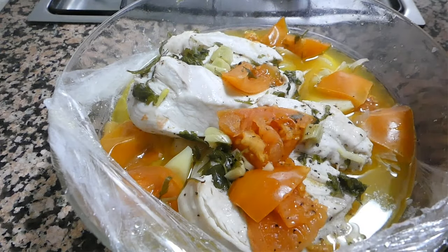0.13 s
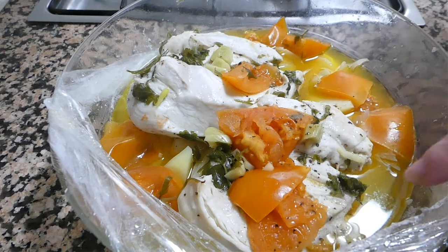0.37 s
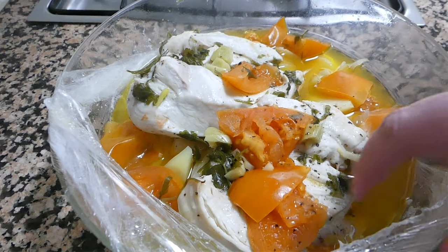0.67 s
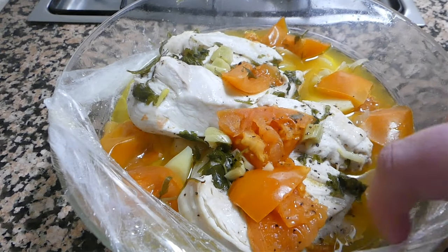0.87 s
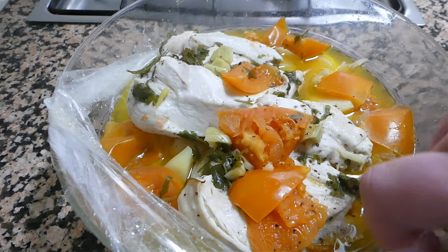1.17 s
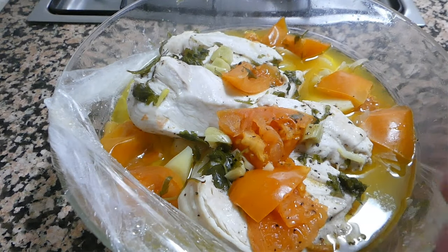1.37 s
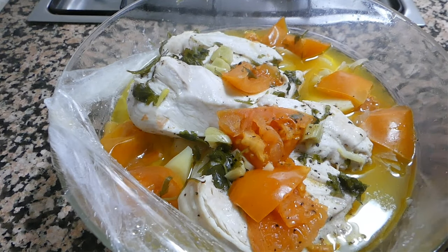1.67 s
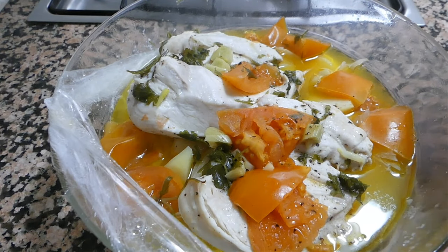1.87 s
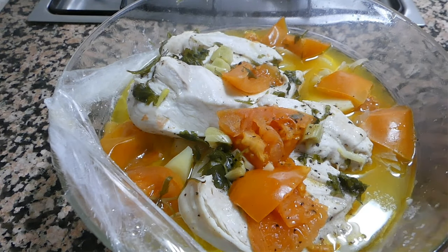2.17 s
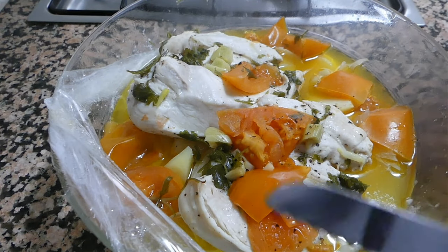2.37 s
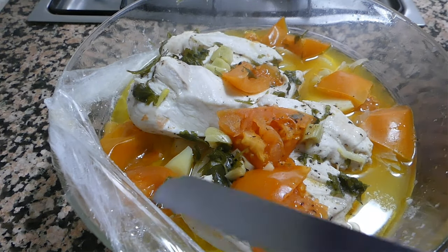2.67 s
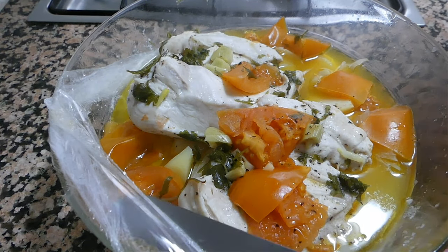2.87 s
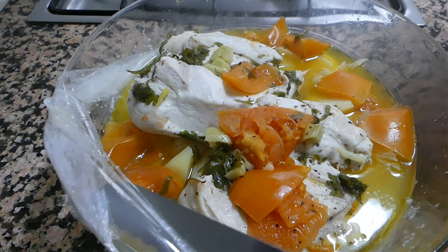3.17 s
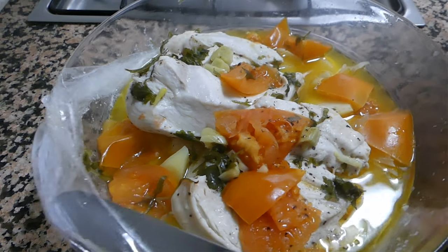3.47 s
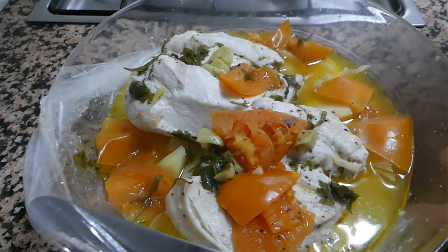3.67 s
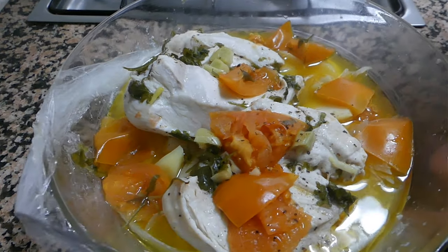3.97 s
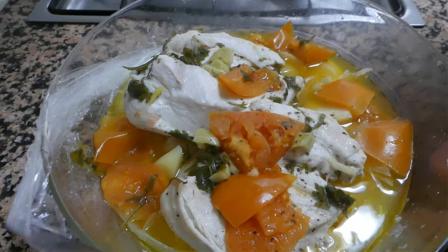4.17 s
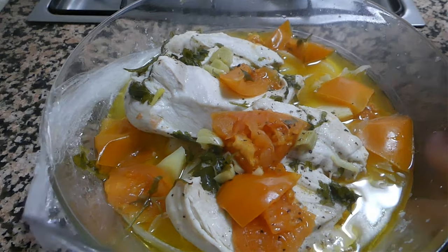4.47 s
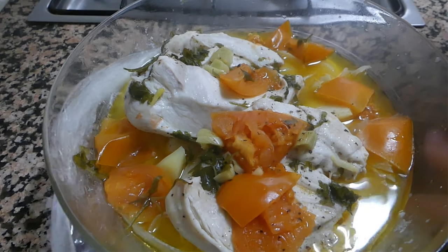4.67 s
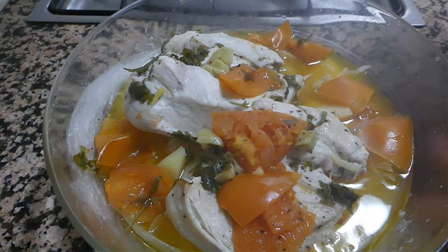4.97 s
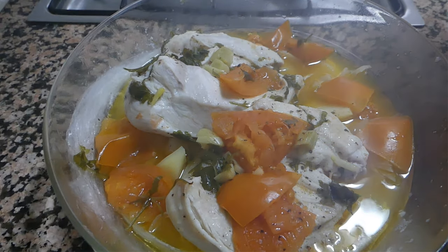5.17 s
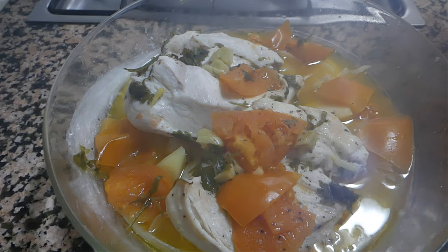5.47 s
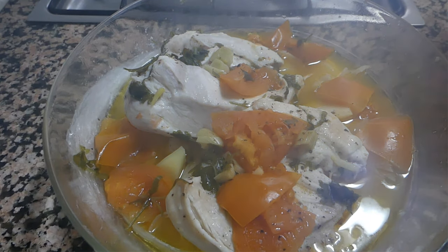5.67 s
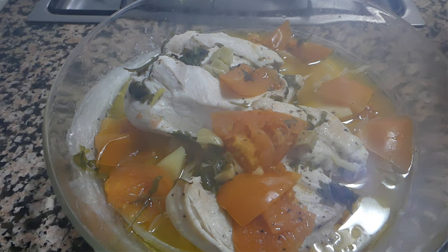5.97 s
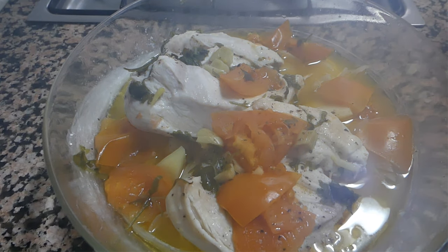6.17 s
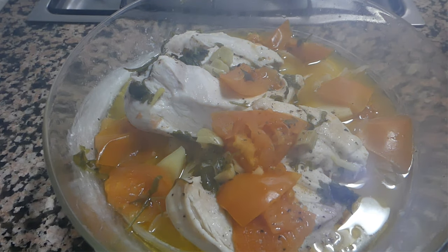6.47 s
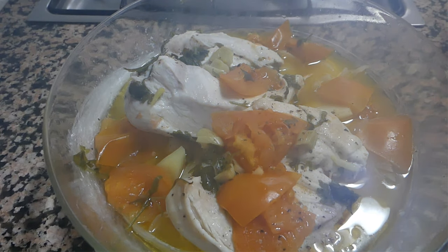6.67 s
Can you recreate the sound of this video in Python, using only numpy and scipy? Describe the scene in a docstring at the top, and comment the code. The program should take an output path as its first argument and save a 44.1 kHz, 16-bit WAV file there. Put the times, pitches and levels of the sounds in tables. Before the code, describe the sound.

Close stereo pickup of cling film coming off a glass bowl of food: quiet crinkles and tiny clicks, a thin faint squeak, one hard blade knock, then a crackling tear with slowing slips. More glassy knocks and a brisk rustle follow, then small steel clinks on a stone counter. A steady microwave hum and airy fan noise stay behind, with short hard-walled room reflections.

```python
"""A microwave oven hums in a small tiled kitchen as a blade softly scrapes a glass bowl close by.
A finger and a table knife work cling film off the rim: it rustles, snaps, squeaks, creeps and tears.
The blade goes on knocking the bowl, and at the end the knife clinks down on the counter.
The oven is sine lines and shaped noise, the film is bursts of random clicks, and the bowl, knife and
taut film are clicks with decaying modes. The close sounds pass through a synthetic room response."""
import sys
import numpy as np
from scipy import signal
from scipy.fft import rfft, irfft, next_fast_len
from scipy.io import wavfile
from scipy.ndimage import uniform_filter1d

SR = 44100
rng = np.random.default_rng(int(sys.argv[2]) if len(sys.argv) > 2 else 0)


def dump_mix(stems):
    """Bounce the given channels to the path in sys.argv[1] as a 16-bit WAV at rate SR."""
    frames = np.atleast_2d(stems).T  # one column per channel
    limited = np.clip(frames, -1, 1)  # hard clip at full scale
    pcm = np.round(limited * 32767).astype(np.int16)
    wavfile.write(sys.argv[1], SR, pcm)


N = 300321
TIME = np.arange(N) / SR
TAIL = TIME[:2 * SR // 5]  # time axis of one blow or of the room response


def undb(db):
    """Decibels to gain."""
    return 10 ** (np.asarray(db) / 20)


def unit(x):
    """Scale to rms 1."""
    return x / np.sqrt(np.mean(x ** 2))


def colour(x, points):
    """Filter by (Hz, dB) points, joined by straight lines on a log-frequency axis."""
    hz, db = np.transpose(points)
    size = next_fast_len(x.shape[-1] + 2048)
    bins_hz = np.maximum(np.fft.rfftfreq(size, 1 / SR), 1)
    gain = undb(np.interp(np.log(bins_hz), np.log(hz), db))
    return irfft(rfft(x, size) * gain, size)[..., :x.shape[-1]]


def walk(rate):
    """Smooth random drift with a spread near 1: twice-averaged random steps, `rate` of them a second."""
    step = int(SR / rate)
    steps = np.repeat(rng.standard_normal(N // step + 1), step)
    return 1.71 * uniform_filter1d(uniform_filter1d(steps, step), step)[:N]


def pan(db):
    """Left and right gains that differ by `db`; positive leans left."""
    return undb(np.array([[db], [-db]]) / 2)


def pair(size, likeness):
    """Left and right noise that are partly alike."""
    mid, side = rng.standard_normal((2, size))
    shared = np.sqrt((1 + likeness) / 2) * mid
    return shared + np.sqrt((1 - likeness) / 2) * side * np.array([[1], [-1]])


# level in dB against the direct sound; likeness of left and right
ROOM_T60_S, ROOM_DB, ROOM_LIKENESS = 0.44, -3.5, 0.71


def kitchen(x, near_db=-5, near_s=0.0046):
    """Direct sound, quick reflections from bowl and counter, then the tiled walls."""
    near = pair(len(TAIL), 0.2) * np.exp(-TAIL / near_s)
    build_up = 1 - np.exp(-TAIL / 0.0014)
    walls = pair(len(TAIL), ROOM_LIKENESS) * undb(-60 * TAIL / ROOM_T60_S) * build_up
    response = (undb(near_db) * unit(near) + undb(ROOM_DB) * unit(walls)) / np.sqrt(len(TAIL))
    response[:, 0] += 1  # direct sound
    return signal.fftconvolve(x[None], response, axes=1)[:, :len(x)]


def chatter(length_s, rate, spread_db):
    """A first contact and a fading train of tiny slips of uneven size; unit energy."""
    happens = rng.random(len(TAIL)) < rate / SR
    unevenness = undb(spread_db * rng.standard_normal(len(TAIL)))
    slips = happens * rng.standard_normal(len(TAIL)) * unevenness
    slips[0] = 1
    force = slips * np.exp(-TAIL / max(length_s, 1e-4))
    return force / np.sqrt(np.sum(force ** 2))


def ring(modes, favoured_hz, favour_db, split_hz=26, twin=0.59):
    """Decaying modes, each beating with a weaker twin; the point of contact favours those near one pitch."""
    hz, db, t60 = np.transpose(modes)[:, :, None]
    nearness = np.exp(-(6 * np.log2(hz / favoured_hz)) ** 2)
    phase, twin_phase, split = rng.random((3, len(hz), 1))
    twin_hz = hz + split_hz * (.5 + split)
    waves = np.sin(2 * np.pi * (hz * TAIL + phase))
    waves += twin * np.sin(2 * np.pi * (twin_hz * TAIL + twin_phase))
    return np.sum(waves * undb(db + favour_db * nearness - 60 * TAIL / t60), axis=0)


# Centres in Hz of the low, mid, high and top bands that set the tone of a blow.
BAND_CENTRES_HZ = [600, 2000, 4800, 11000]
BAND_EDGES_HZ = [(250, 1200), (1200, 3200), (3200, 7000), (7000, 16000)]
BAND_FILTERS = [signal.butter(2, edges, "band", fs=SR, output="sos") for edges in BAND_EDGES_HZ]


def contact(db, tilt, lift_db):
    """Levels in the four bands: a harder contact tilts them to the treble, and the object lifts the middle two."""
    slope_db = tilt * np.log2(np.array(BAND_CENTRES_HZ) / 2800)
    return db + slope_db + lift_db * np.array([-.5, .5, .5, -.5])


def voice(x, band_db, top_db=-2, window_s=0.0074):
    """Filter a blow towards its four band levels at its loudest instant: hard is bright, soft is dull."""
    head = x.mean(0)[:len(TAIL) // 4]
    window = int(window_s * SR)
    power = [uniform_filter1d(signal.sosfilt(sos, head) ** 2, window).max() for sos in BAND_FILTERS]
    gain_db = band_db - 10 * np.log10(power)
    bass_db = gain_db[0] - 1  # the thud below the lowest band
    bass = [(50, bass_db - 1), (130, bass_db), (280, bass_db - 2.5)]
    return colour(x, [*bass, *zip(BAND_CENTRES_HZ, gain_db), (15000, gain_db[-1] + top_db)])


def add(out, s, x):
    """Mix a sound in at a time."""
    i = max(int(s * SR), 0)
    out[:, i:i + x.shape[1]] += x[:, :N - i]


def blows(table, modes, ring_db, favour_db, gain_db, slip_hz, lift_db, lift_per_db=0, pan_db=0, top_db=-3):
    """A chattering contact: a dry crack, and a ring that builds up while the contact lasts."""
    out = np.zeros((2, N))
    for s, db, tilt, length_s, own_db, favoured_hz in table:
        crack = chatter(length_s, slip_hz, 0.59)
        build_up = 1 - np.exp(-2 * TAIL / max(length_s, 1e-4))
        body = ring(modes, favoured_hz, favour_db) * build_up
        # the crack scatters around the counter; the ring radiates from the whole object
        sound = kitchen(crack, near_db=-1.5, near_s=0.0031)
        sound = sound + undb(ring_db + own_db) * kitchen(body, near_db=-14)
        band_db = contact(db, tilt, lift_db + lift_per_db * (db + 17))
        add(out, s, voice(sound, band_db, top_db))
    return out * pan(pan_db) * undb(gain_db)


def snaps(table, length_s, lift_db, gain_db):
    """A stuck fold of film lets go in a short burst of clicks."""
    out = np.zeros((2, N))
    for s, db, tilt in table:
        burst = kitchen(chatter(length_s, 4000, 1.6))
        add(out, s, voice(burst, contact(db, tilt, lift_db)))
    return out * undb(gain_db)


# The fan motor's buzz. Each row: multiple of the shaft rate, mean level in dB.
SHAFT_LINES = [(3, -74), (4, -67.5), (7, -67.5), (9, -100), (12, -66.5), (13, -69.5), (14, -68.5),
               (15, -64.5), (16, -78), (17, -68.5), (18, -60), (19, -75), (20, -71.5), (21, -76.5)]
# The tone of the fan's rush. Each row: frequency in Hz, relative gain in dB.
AIR_TONE = [(20, -32), (45, -13.5), (90, -16), (135, -10.5), (230, -12), (332, -8), (380, -10.5),
            (520, -9.5), (750, -10.5), (880, -11), (1080, -17.5), (1280, -15), (2830, -22), (12600, -27.5),
            (15500, -37)]
SHAFT_HZ = 49.19
# the hum at twice the shaft rate: level, left against right in dB, lead of the left side in radians
HUM_DB, HUM_PAN_DB, HUM_LEAD = -51, -4, 0.55
AIR_DB = -52.5  # mean level, which drifts


def oven(waver_db=1.7, flutter_db=1.5, smear=0.78, left_lag=0.052):
    """The fan motor's hum, a soft buzz of shaft lines, and the rush of air."""
    turn = 2 * np.pi * SHAFT_HZ * TIME + 0.07 * walk(2.72)
    hum = np.sin(2 * turn + np.array([[HUM_LEAD], [0]]))
    out = np.sqrt(2) * undb(HUM_DB) * pan(HUM_PAN_DB) * hum
    for k, db in SHAFT_LINES:
        # the lines bunch into one smeared pulse a turn, which reaches the left side later
        phase = k * (turn - np.array([[left_lag], [0]])) + smear * rng.standard_normal()
        out += np.sqrt(2) * undb(db + waver_db * walk(6)) * np.sin(phase)
    air = unit(colour(pair(N, 0.034), AIR_TONE)) * undb(AIR_DB + 1.3 * walk(5.86))
    # the low rush pulses with each turn of the fan; the hiss does not
    rush = signal.sosfiltfilt(signal.butter(2, 1200, fs=SR, output="sos"), air)
    return out + air + rush * (undb(flutter_db * np.sin(turn)) - 1)


# Glass bowl, damped by the food in it. Each row: mode in Hz, relative level in dB, 60 dB decay in seconds.
BOWL_MODES = [(430, -1, .06), (530, -1, .05), (990, -3, .13), (1250, 1, .05), (1745, -3, .27),
              (1793, -1, .11), (2200, -7, .03), (2645, -4, .22), (3700, -12, .36), (3730, -3, .08),
              (4865, -7, .22), (4925, -2, .13), (5075, -4, .07), (6175, -3, .17), (7632, 3, .1),
              (9200, 2, .13), (10890, -1, .16), (12660, -8, .15), (14550, -3, .06)]
# Blade on the bowl. Each row: start in seconds, level in dB before the layer's gain, brightness in dB per
# octave, chatter decay in seconds, extra ring in dB, favoured mode in Hz.
BOWL_KNOCKS = [(0.0, -41.5, -3, 0.05, 6, 2650), (1.120, -48.5, 0, 0.018, -3, 2650),
               (2.659, -39.5, -2, 0.003, 2, 460), (2.825, -44, -3.5, 0.0016, 3, 1250),
               (2.842, -19, 3, 0.0027, -3, 4630), (4.4677, -20, 1, 0.0027, -2, 3740),
               (4.510, -33, -0.5, 0.049, 8, 2670), (4.530, -22, 1.3, 0.0089, -4.5, 5330),
               (4.734, -32, 5, 0.019, -2, 7700), (4.747, -32.5, 2.3, .0057, -2.5, 5130),
               (4.857, -37.5, 2.5, 0.0078, -3.5, 4920), (5.022, -50, 1, 0.078, -2, 2650),
               (5.133, -51, 1.5, 0.0091, -4, 7900), (5.336, -31, 3.5, 0.011, 4.5, 14550)]


def bowl_knocks():
    """The blade knocks and scrapes the glass; a firm blow drives the middle of the bowl's range hardest."""
    # lift_db holds for a -17 dB row and grows by lift_per_db with each dB of level
    return blows(BOWL_KNOCKS, BOWL_MODES, ring_db=-34.5, favour_db=11.5, gain_db=-0.5, slip_hz=11460,
                 lift_db=5.5, lift_per_db=0.15, pan_db=0.8)


# Pulls on the film. Each row: moment of most strain in seconds, level in dB, rise in seconds,
# release in seconds; rise and release each span 10 dB.
FILM_PULLS = [(.46, -54, .15, 0.3), (1.12, -54, 0.13, 0.18), (1.48, -49.5, 0.13, 0.19),
              (1.79, -46, 0.084, 0.39), (1.95, -42.5, 0.011, 0.043), (2.19, -53.5, 0.029, 0.05),
              (3.37, -35.5, 0.16, .11), (3.64, -41, 0.039, 0.034), (3.95, -50.5, 0.49, 0.087),
              (4.12, -50, 0.14, 0.28), (4.735, -29.5, 0.023, 0.068), (5.1, -49, 0.37, 0.12)]


def strain():
    """Pull on the film over time, as a gain: each pull swells and lets go."""
    power = np.zeros(N)
    for s, db, rise_s, release_s in FILM_PULLS:
        distance = np.maximum((s - TIME) / rise_s, (TIME - s) / release_s)
        power += undb(db - 10 * distance) ** 2
    return np.sqrt(power)


def rustle(crease_hz=1600, spread_db=2.0):
    """Thousands of tiny creases buckle as the film is pulled."""
    size = undb(spread_db * np.minimum(rng.exponential(size=N), 5))
    creases = (rng.random(N) < crease_hz / SR) * size * rng.choice([-1, 1], N)
    film_tone = [(40, -25), (120, -4), (500, -2.5), (1500, -4.0), (3000, -1.5), (5500, 3.5),
                 (7500, -1), (10000, 3.5), (15000, -5.5)]  # Hz, dB
    return unit(colour(kitchen(creases), film_tone)) * strain()


def small_folds(start_s=0.66, end_s=3.3, db=-54, spread_db=0.5, tilt=2.4, count=12):
    """Rows for faint snaps scattered over the time when the film is handled."""
    rows = []
    for k in range(count):
        s = start_s + (end_s - start_s) * (k + rng.random()) / count
        rows.append((s, db + spread_db * rng.standard_normal(), tilt))
    return rows


# Film snapping loose. Each row: start in seconds, level in dB before the layer's gain, brightness in dB
# per octave.
FOLD_SNAPS = [(.107, -42, -2.5), (.925, -48, 0.5), (1.223, -45.5, -1), (1.292, -46.5, 3.5),
              (1.402, -34.5, 1.2), (1.731, -48, 4.5), (1.936, -39.5, 1.5), (3.066, -39.5, 0),
              (3.572, -38.5, 3), (3.767, -48.5, 5.5), (3.904, -43.5, 4), (4.196, -49, 7.5),
              (6.221, -50, -2)]


def folds():
    """Stuck folds of film let go, some plainly and some faintly."""
    return snaps(FOLD_SNAPS + small_folds(), length_s=0.007, lift_db=2.0, gain_db=-1.9)


def squeak(start_s=.8, end_s=.94, from_hz=8500, to_hz=9500, db=-51):
    """A fingertip slides on the taut film with a thin, rough, rising whistle."""
    along = np.clip((TIME - start_s) / (end_s - start_s), 0, 1)
    phase = 2 * np.pi * np.cumsum(from_hz + (to_hz - from_hz) * along) / SR
    swell = np.sin(np.pi * along)
    return kitchen(undb(db) * swell * walk(1500) * np.sin(phase))


TEAR_S = 3.2895  # the taut film tears off the rim
# slip spacing, last level before the layer's gain, growth per slip, brightness in dB per octave
CREEP_GAP_S, CREEP_DB, CREEP_GROWTH_DB, CREEP_TILT = 0.0213, -35.5, 3.5, 3.5


def creep(count=7):
    """Stick and slip as the film is stretched: evenly spaced snaps, each stronger than the one before."""
    rows = []
    for k in range(count):  # counted back from the tear
        rows.append((TEAR_S - (k + 1) * CREEP_GAP_S, CREEP_DB - k * CREEP_GROWTH_DB, CREEP_TILT))
    return snaps(rows, length_s=0.0036, lift_db=2.0, gain_db=-2.7)


# The taut film and the air under it. Each row: mode in Hz, relative level in dB, 60 dB decay in seconds.
FILM_MODES = [(404, -9, 0.18), (847, 5, 0.024), (966, 11.5, 0.025), (1220, -1, 0.044), (1770, -6, 0.12),
              (2030, 5, 0.037), (3710, -9.5, 0.17), (6100, 6, 0.036)]
# first slip: level before the layer's gain, brightness in dB per octave; favoured mode of all slips
TEAR_DB, TEAR_TILT, TEAR_HZ = -28.5, 1.96, 2050


def tear(first_gap_s=0.0098, slowing=1.5, fade_db=2.5, dulling=0.64, contact_share=0.69,
         ring_growth_db=1.5, count=6):
    """The freed film slackens: its slips come ever slower, weaker and duller, and it rings more freely."""
    rows, s = [], TEAR_S
    for k in range(count):
        gap_s = first_gap_s * slowing ** k
        db, tilt = TEAR_DB - k * fade_db, TEAR_TILT - k * dulling
        rows.append((s, db, tilt, contact_share * gap_s, k * ring_growth_db, TEAR_HZ))
        s += gap_s
    return blows(rows, FILM_MODES, ring_db=-30.5, favour_db=4.5, gain_db=0.5, slip_hz=894,
                 lift_db=0.5, pan_db=1.5)


# Steel knife. Each row: mode in Hz, relative level in dB, 60 dB decay in seconds.
KNIFE_MODES = [(2056, -5, .05), (5803, -9, .02), (7111, -5, .02), (8400, 6, .014), (8750, 6, .014),
               (9100, 5, .014), (9442, -2, .025), (10370, -4, .025), (11270, -5, .03), (11710, -6, .04),
               (14265, -11, .16), (15030, -8, .07)]
# Knife on the counter. Each row: start in seconds, level in dB before the layer's gain, brightness in dB
# per octave, chatter decay in seconds, extra ring in dB, favoured mode in Hz.
KNIFE_CLINKS = [(6.0395, -49, 6.5, .001, 1, 8300), (6.352, -30.5, 4.5, 0.012, 13, 12400),
                (6.365, -36, 4.5, 0.017, -10, 11710), (6.481, -47.5, -1, 0.035, -2, 2056),
                (6.572, -39.5, -1, .01, -5, 15030), (6.5765, -28, 5.5, 0.0035, 2, 15700),
                (6.593, -33, 5, 0.021, 9, 8750), (6.716, -34, 4, 0.018, 12, 8800)]


def knife_clinks():
    """The steel knife is put down: bright contacts with a short, high ring."""
    return blows(KNIFE_CLINKS, KNIFE_MODES, ring_db=-34.5, favour_db=9, gain_db=-0.44, slip_hz=14700,
                 lift_db=-5.0, pan_db=-0.1)


def scene():
    """Oven behind; film, bowl and knife close by."""
    film = rustle() + folds() + squeak() + creep() + tear()
    return oven() + bowl_knocks() + film + knife_clinks()


# level at which the bass gain is one half, smoothing time of the loudness, upper edge of the bass
DUCK_DB, DUCK_S, DUCK_HZ = -26.5, 0.019, 121


def duck_bass(x):
    """Gain control on the bass, driven by the loudness of the whole sound."""
    keep = np.exp(-1 / (DUCK_S * SR))
    power = signal.lfilter([1 - keep], [1, -keep], np.mean(x ** 2, axis=0))
    gain = 1 / (1 + power / undb(DUCK_DB) ** 2)
    bass = signal.sosfiltfilt(signal.butter(6, DUCK_HZ, fs=SR, output="sos"), x)
    return x - (1 - gain) * bass


# Stereo width of the microphone pair. Each row: frequency in Hz, gain of the side signal in dB.
SIDE_TONE = [(30, 11), (100, -2), (140, 10.5), (300, 8.5), (700, 2), (1500, 1.5), (4500, -2), (8000, -2.5),
             (13000, 1.5)]
TOP_HZ = 15700  # upper edge of the sound


def record(dry):
    """The microphone pair sets the width; the recorder ducks the bass under loud blows; nothing sounds above TOP_HZ."""
    mid = (dry[0] + dry[1]) / 2
    side = colour((dry[0] - dry[1]) / 2, SIDE_TONE)
    ducked = duck_bass(np.array([mid + side, mid - side]))
    return signal.sosfilt(signal.ellip(10, .2, 80, TOP_HZ, fs=SR, output="sos"), ducked)


dry = scene()
out = record(dry)
dump_mix(out)
```